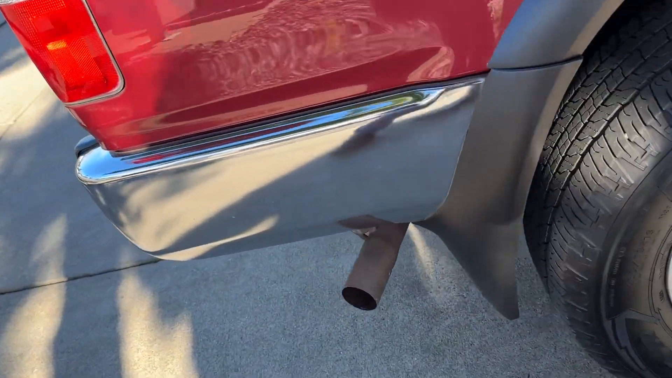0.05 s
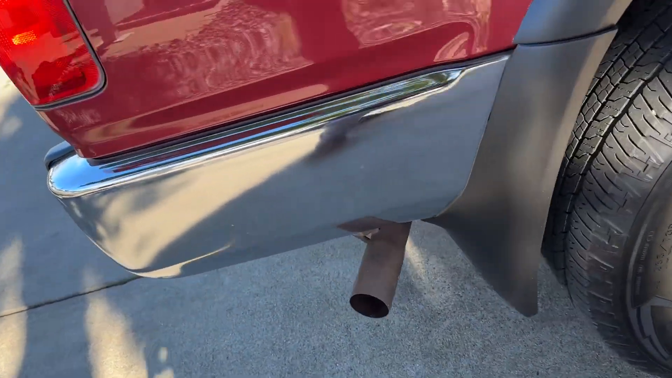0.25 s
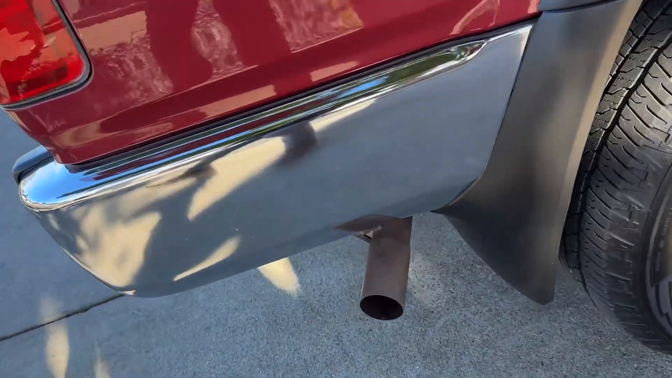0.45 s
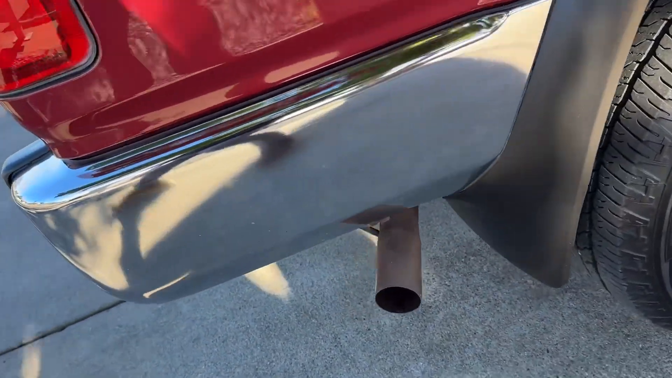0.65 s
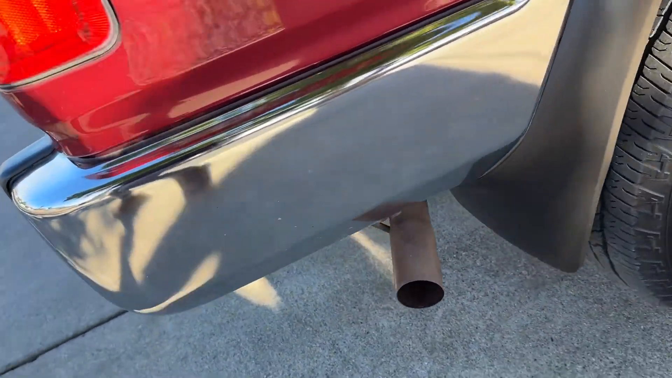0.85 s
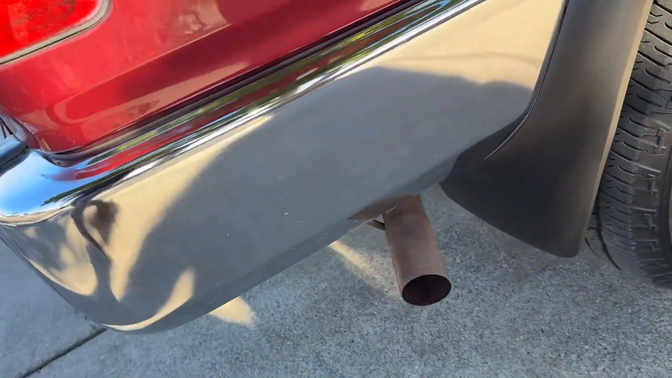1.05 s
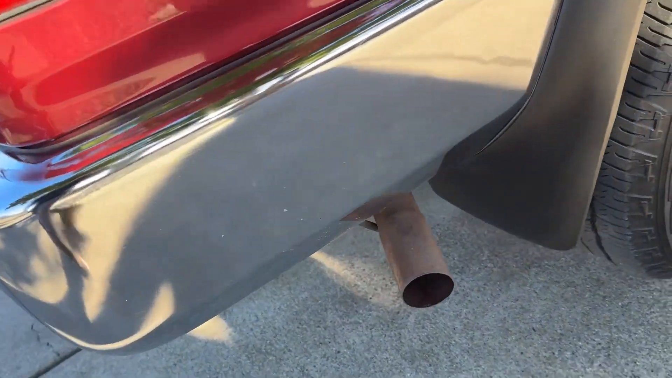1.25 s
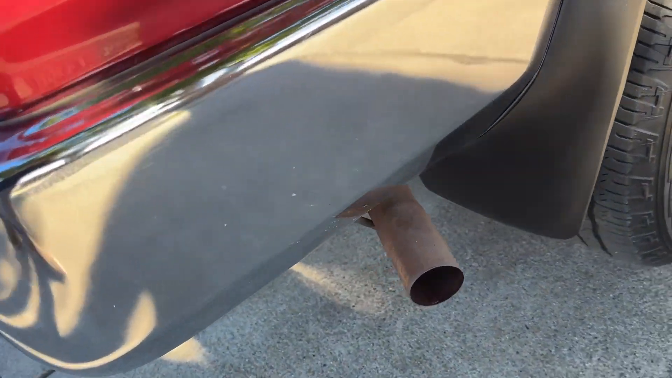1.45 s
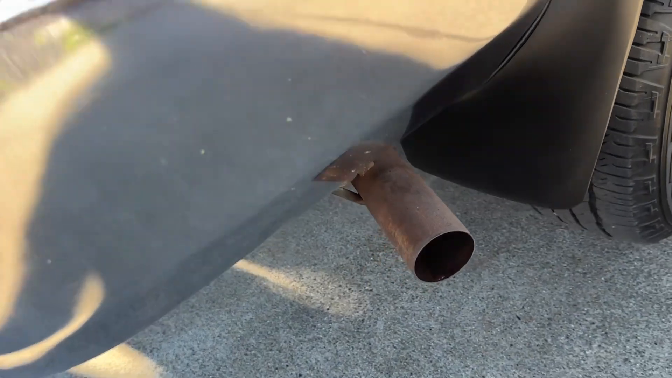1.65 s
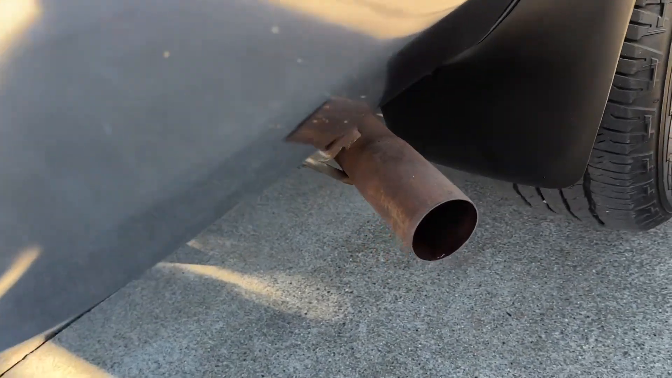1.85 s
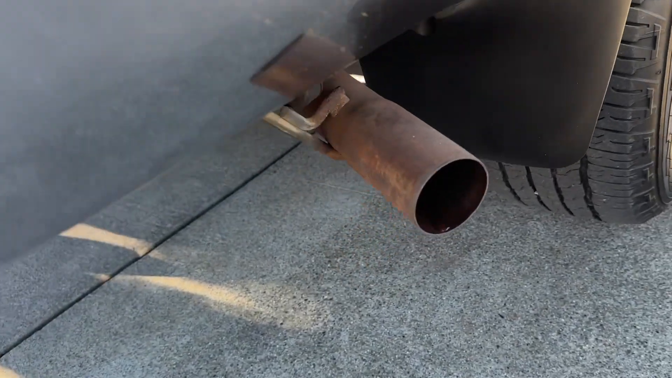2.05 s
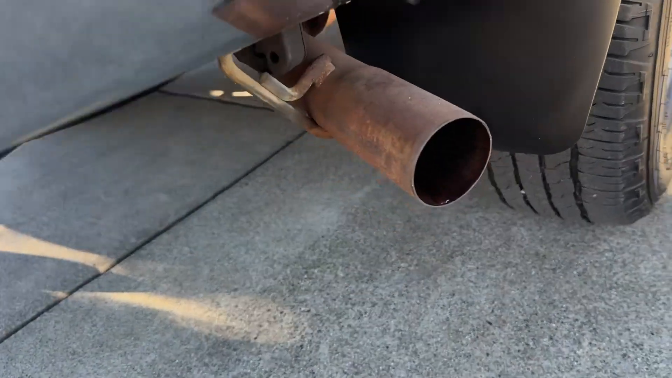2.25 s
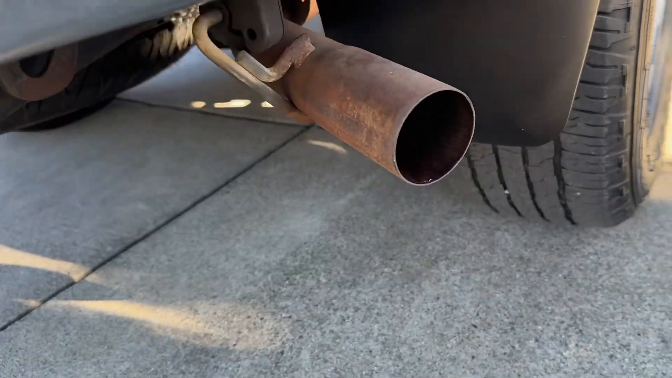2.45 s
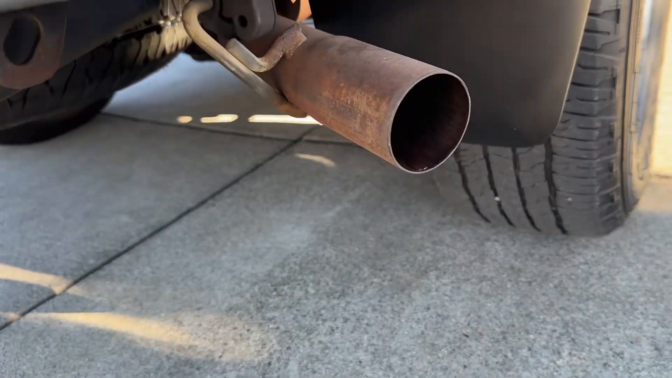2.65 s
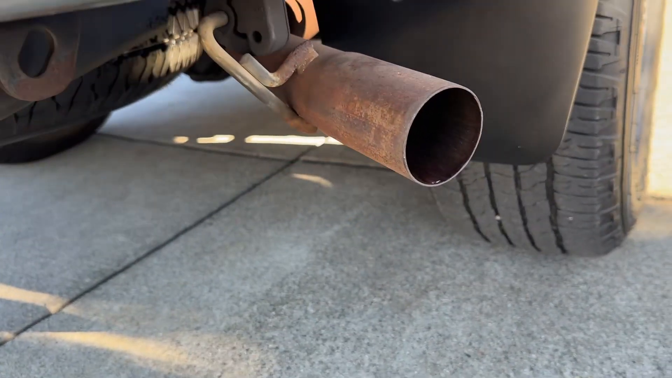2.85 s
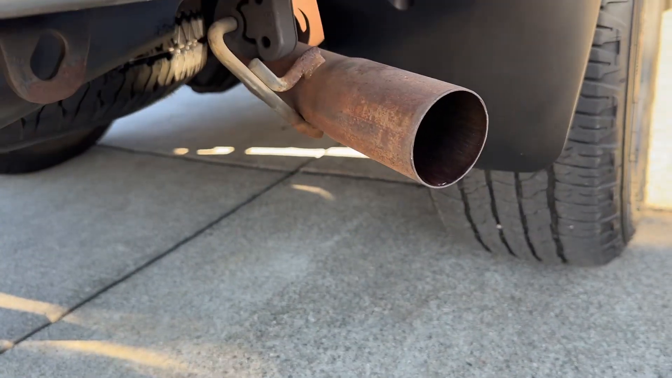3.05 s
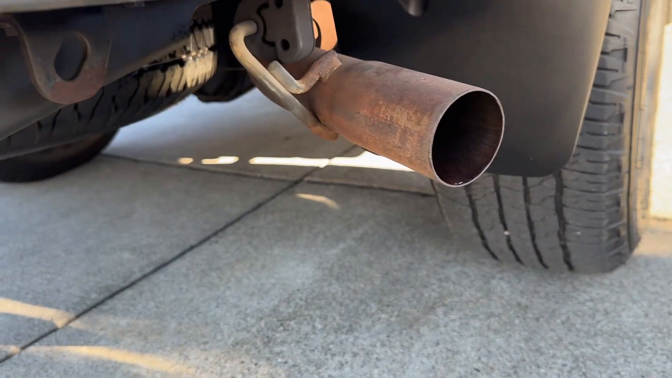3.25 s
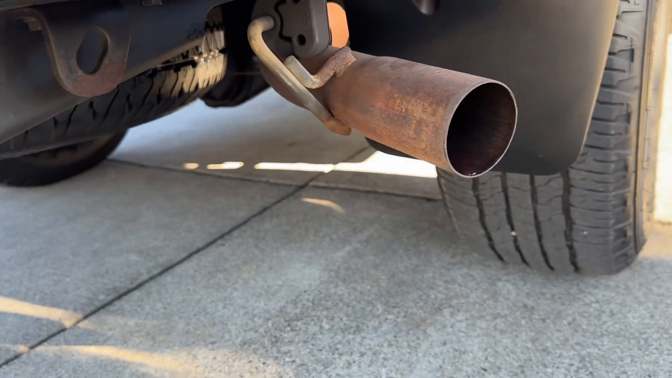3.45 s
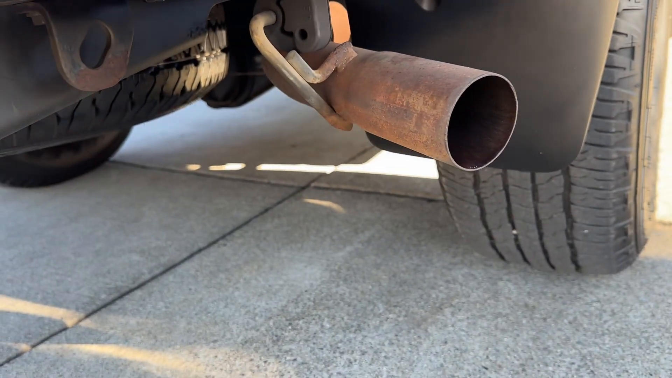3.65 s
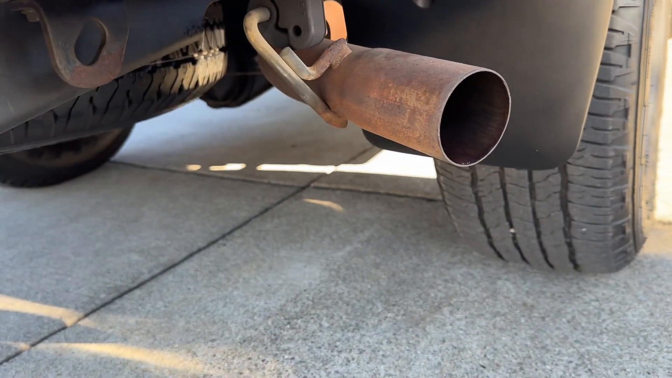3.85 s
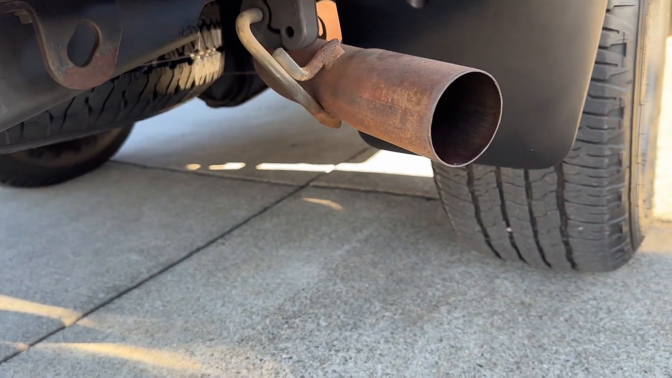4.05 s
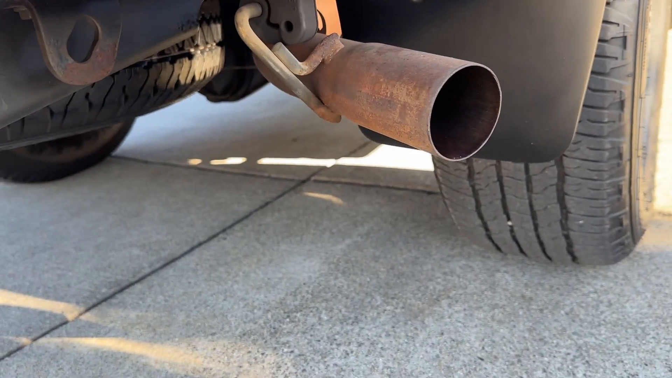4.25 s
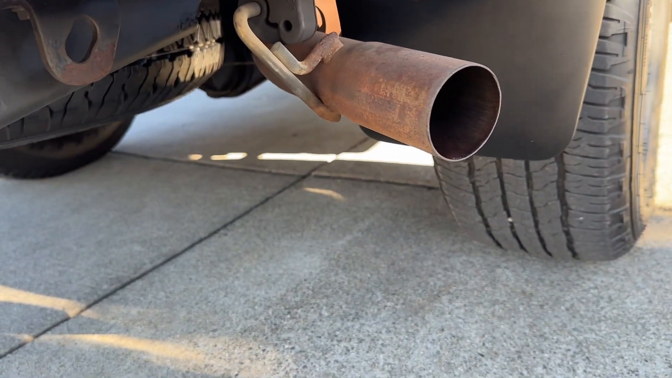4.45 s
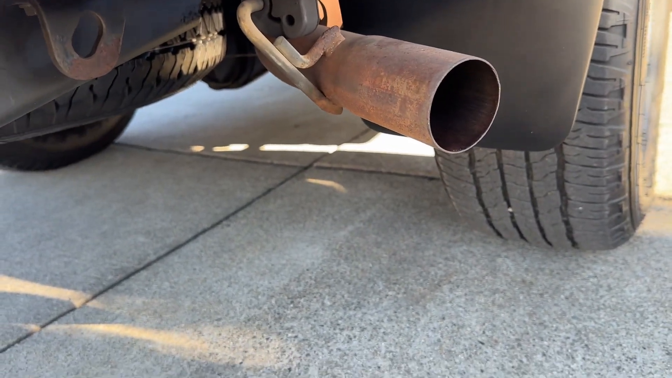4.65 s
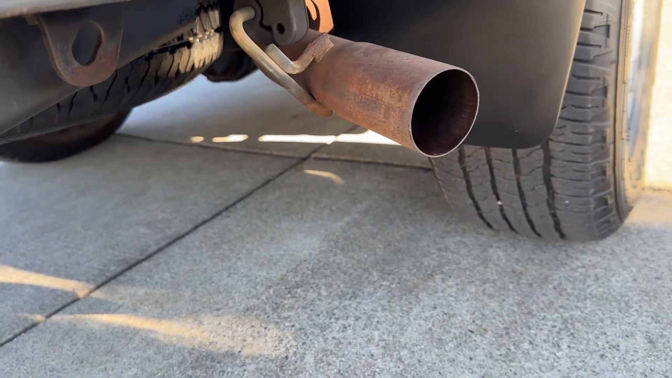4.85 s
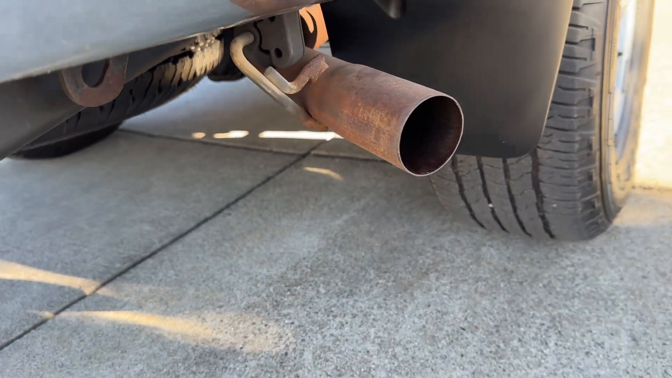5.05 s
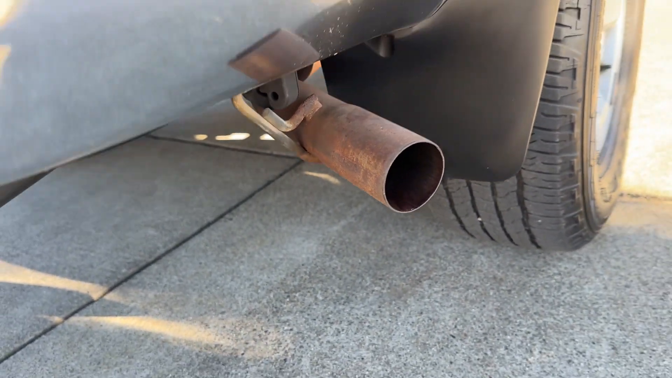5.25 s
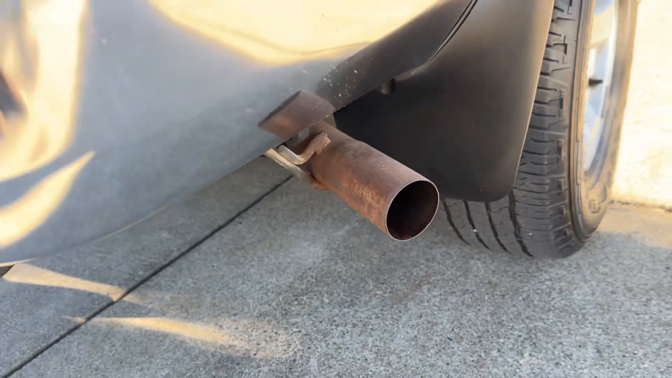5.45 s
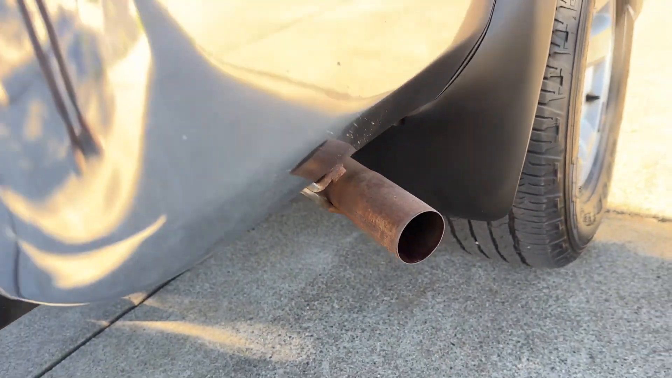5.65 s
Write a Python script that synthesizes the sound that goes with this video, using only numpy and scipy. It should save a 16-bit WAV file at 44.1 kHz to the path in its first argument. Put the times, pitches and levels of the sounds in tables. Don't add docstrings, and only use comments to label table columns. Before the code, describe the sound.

A truck's six-cylinder engine idles steadily outdoors, its low exhaust drone growing closer and raspier as the microphone sinks to the tailpipe.

```python
import sys
import numpy as np
from scipy import signal
from scipy.fft import rfft, irfft
from scipy.io import wavfile
from scipy.ndimage import uniform_filter1d

SR = 44100
rng = np.random.default_rng(int(sys.argv[2]) if len(sys.argv) > 2 else 0)


def master(y):
    cut = np.clip(np.atleast_2d(y).T, -1, 1)
    pcm = np.round(cut * 32767)
    wavfile.write(sys.argv[1], SR, pcm.astype(np.int16))


def gain_from_decibels(decibels):
    exponent = np.asarray(decibels, float) / 20
    return 10 ** exponent


N = 251370


def rms_one(x):
    return x / np.sqrt(np.mean(x ** 2) + 1e-20)


def at_hz(points, hz):
    known_hz, level_db = np.transpose(points)
    return np.interp(np.log(hz), np.log(known_hz), level_db)


def bell(s, width):
    return np.exp(-((np.arange(N) / SR - s) / width) ** 2)


def drift(rate):
    r = np.exp(-80 * np.pi * rate / SR)
    slow = signal.lfilter([1], [1, -2 * r, r * r], rng.standard_normal(N // 40 + 2002))[2000:]
    return np.interp(np.arange(N) / 40, np.arange(len(slow)), rms_one(slow))


def butter(x, order, hz, kind="low"):
    return signal.sosfilt(signal.butter(order, hz, kind, fs=SR, output="sos"), x)


def resonance(x, hz, width):
    r = np.exp(-np.pi * width / SR)
    return signal.lfilter([(1 - r * r) / 2, 0, (r * r - 1) / 2],
                          [1, -2 * r * np.cos(2 * np.pi * hz / SR), r * r], x)


def flickering(low_hz, top_hz, patchy_db, rate):
    out, together = 0, drift(4.3)
    edges = np.geomspace(low_hz, top_hz, round(2 * np.log2(top_hz / low_hz)) + 1)
    white = rng.standard_normal((2, N))
    for k, (low, high) in enumerate(zip(edges, edges[1:])):
        band = butter(white[k % 2], 2, [low, high], "band")
        depth_db = patchy_db * (1 + .5 * (low > 11000))
        out = out + gain_from_decibels(depth_db * (0.14 * together + drift(rate))) * band
    return out


def coloured(x, spectrum, turn=0):
    hz = np.arange(1, N // 2 + 2) * SR / N
    inside = (hz > spectrum[0][0] / 2) & (hz < spectrum[-1][0])
    shape = inside * gain_from_decibels(at_hz(spectrum, hz)) * np.exp(1j * turn)
    return rms_one(irfft(rfft(x) * shape, N))


def banded_noise(spectrum, patchy_db, rate):
    return coloured(flickering(spectrum[0][0] / 2, spectrum[-1][0], patchy_db, rate), spectrum)


# [f/Hz, level/dB per Hz]
YARD_SPECTRUM = [(40, 3.5), (140, 0), (700, -7.5), (900, -12.5), (1550, -7), (2000, -27), (3000, -19.5),
                 (4600, -29), (7300, -25), (8400, -41), (9300, -28.5), (12200, -39), (12900, -33.5),
                 (13250, -66.5)]


def yard_scatter(hiss):
    scatter = flickering(23.6, 16100, patchy_db=1.2, rate=14)
    out_of_step = coloured(hiss, YARD_SPECTRUM, turn=1.8)
    return gain_from_decibels(-39) * (0.73 * out_of_step + 0.49 * coloured(scatter, YARD_SPECTRUM))


# [f/Hz, level/dB per Hz]
BAY_SPECTRUM = [(1200, -3), (2000, 2.5), (3300, 0), (5300, -3.5), (6900, -3), (7700, -8), (8150, -1.5),
                (9500, -7), (10200, -17.5), (10450, -48.5), (12250, -42.5), (12600, -16), (15600, -10),
                (15850, -47)]


def engine_bay(hiss, firings, fifth_db):
    shade_db = -3.0 * np.exp(-((fifth_db + 28.5) / 1.5) ** 2)
    spray_db = 8.5 * bell(2.04, 0.02)
    valve_beat_db = .3 * np.cos(2 * np.pi * firings / 1.5) + .3 * np.cos(4 * np.pi * firings + .3)
    return gain_from_decibels(-50 + shade_db + spray_db + valve_beat_db) * coloured(hiss, BAY_SPECTRUM)


# [f/Hz, width/Hz, level/dB, loudest t/s, span/s]
WHISTLE_LINES = [
    (1897, 4, -59, 1.7, .4),
    (1174, 6, -57, .3, .5),
    (2378, 12, -62, 3.8, .7),
    (1430, 130, -54, 1.3, .4),
    (1060, 220, -48, 1.95, .2),
    (1375, 60, -55, 4.0, .7),
    (3060, 160, -61, 4.5, .6),
    (6600, 1500, -63, .2, .6),
    (6405, 5, -72, 3.0, 2.5),
    (12800, 60, -74, 3.5, 4.0),
]


def whistles():
    out = 0
    for hz, width, level_db, s, span in WHISTLE_LINES:
        thin = resonance(resonance(rng.standard_normal(N), hz, width), hz, width)
        out = out + gain_from_decibels(level_db) * bell(s, span) * rms_one(thin)
    return out


# [t/s, length/s, level/dB]
GUST_SWELLS = [(0.008, 0.061, -27), (0.28, 0.039, -28.5), (.47, 0.056, -28), (0.715, 0.085, -31),
               (1.26, 0.056, -25), (1.347, 0.076, -23.5), (1.45, 0.042, -18.5), (1.537, 0.082, -26),
               (1.612, 0.067, -22), (1.705, 0.039, -20), (1.89, 0.03, -29), (1.933, 0.028, -14.5),
               (2.015, 0.076, -18), (2.116, .06, -25), (2.75, 0.038, -24), (3.276, 0.058, -22.5),
               (3.682, 0.13, -21.5), (4.202, 0.072, -23), (4.858, 0.054, -29), (5.25, 0.056, -26),
               (5.665, 0.059, -23.5)]
# [f/Hz, level/dB per Hz]
BUFFET_SPECTRUM = [(30, -25), (48, -8), (70, 0), (107, -7), (150, -10), (240, -20), (340, -19), (450, -25),
                   (650, -36)]


def gusts():
    swell = sum(gain_from_decibels(level_db) * bell(s, length / np.sqrt(2)) for s, length, level_db in GUST_SWELLS)
    both, apart = (swell * banded_noise(BUFFET_SPECTRUM, patchy_db=1.0, rate=15) for _ in range(2))
    return both, gain_from_decibels(-14.0) * apart


# [f/Hz, level/dB per Hz]
SOLE_SPECTRUM = [(800, -1), (1150, 9), (2300, -5), (3700, 1), (4300, -3), (5200, 2), (7000, -0.5),
                 (10000, -3), (12500, -19)]


def scuff():
    t = np.arange(N) / SR
    peak_s, swell_s, fade_s = 2.033, 0.025, 0.012
    off_peak = (t - peak_s) / np.where(t < peak_s, swell_s, fade_s)
    stop_db = 1200 * np.maximum(t - 2.068, 0)
    stroke = gain_from_decibels(np.maximum(-35.5 - off_peak ** 2 - stop_db, -200))
    both, apart = (stroke * banded_noise(SOLE_SPECTRUM, patchy_db=0.0, rate=130) for _ in range(2))
    both = signal.sosfilt(signal.cheby2(10, 60, 10400, fs=SR, output="sos"), both)
    return both, gain_from_decibels(-2.5) * butter(apart, 4, 1900, "high")


# [f/Hz, level/dB per Hz]
FLOW_SPECTRUM = [(36, -9.5), (65, 1.5), (120, -3), (200, -5.5), (330, -11), (480, -16.5), (800, -23.5),
                 (1300, -24), (1700, -34.5)]


def gas_rush(rasp_db):
    return gain_from_decibels(0.58 * rasp_db - 6.0) * banded_noise(FLOW_SPECTRUM, patchy_db=-2.0, rate=5.4)


# [level/dB, lateness/share of a firing]
CYLINDER_PATTERN = [
    (0, 0),
    (-2.5, .008),
    (-.8, -.008),
]
# [t/s, level/dB]
ECHOES = [
    (.0095, -11),
    (.0225, -11),
]
# [f/Hz, width/Hz, far level/dB, near level/dB]
OUTLET_RINGS = [(621.3, 8.7, 12, 2), (698.5, 18, 7, -8), (738.7, 22, 0, 2.5), (810, 25, -1.5, -3),
                (938, 32, -0.5, -2), (1031, 20, 1, 1), (1110.5, 12, 3.5, -2), (1165.6, 37.4, 5.5, -3),
                (1226.6, 31, -4, -4), (1286, 45, -14, -10), (1307, 18, -9.5, -3.5), (1394, 21, -4.5, -8.5),
                (1543, 28, -1, -14), (1713, 11, -11.5, -19.5), (1793, 170, -11.5, -5),
                (1956, 90, -7.5, -15.5), (2083, 25, -17.5, -10.5), (2404, 24, -17.5, -8.5),
                (2550, 32, -18, -14), (3000, 120, -20, -12.5), (3690, 92, -23, -15)]


def blowdown_fronts(firings):
    count = np.arange(int(firings[-1]) - 1)
    pattern = np.array(CYLINDER_PATTERN)[count % len(CYLINDER_PATTERN)]
    chance = rng.standard_normal((len(count), 2))
    moment = count + .5 + pattern[:, 1] + .001 * chance[:, 0]
    at = np.interp(moment, firings, np.arange(N)).astype(int)
    fronts = np.full(N, 1e-18)
    for late_s, level_db in [(0.0021, 0.0099)] + ECHOES:
        fronts[at + int(late_s * SR)] += gain_from_decibels(level_db + pattern[:, 0] + 1.3 * chance[:, 1])
    return butter(rms_one(fronts), 6, 1500)


def outlet_rasp(firings, rasp_db):
    fronts = blowdown_fronts(firings)
    drive = gain_from_decibels(-3) * fronts + rng.standard_normal(N)
    closeness = np.clip((uniform_filter1d(rasp_db, size=SR // 2) + 47) / 13.9, 0, 1)
    rings = 0
    for k, (hz, width, far_db, near_db) in enumerate(OUTLET_RINGS):
        level_db = far_db + closeness * (near_db - far_db) + drift(.8)
        rings = rings + (-1) ** k * gain_from_decibels(level_db) * resonance(drive, hz, min(width, .025 * hz))
    body = gain_from_decibels(0.5 - 1.62 * closeness) * rms_one(rings)
    bark = resonance(resonance(fronts, 1300, 330), 1300, 330)
    return gain_from_decibels(rasp_db) * (body + closeness * gain_from_decibels(-2.5) * rms_one(bark))


# [firing multiple, level/dB]
ORDERS_NEAR = [(1, -42), (2, -14), (3, -2.5), (4, -17), (5, -9), (6, -29.5), (7, -23), (8, -23), (9, -17.5),
               (10, -21.5), (11, -39.5), (12, -26), (13, -35.5), (14, -35.5), (15, -23.5), (16, -38.5),
               (17, -41), (18, -37), (19, -35.5), (20, -48.5), (21, -36), (22, -49), (23, -32)]
# [firing multiple, level/dB]
ORDERS_FAR = [(1, -23), (2, -11), (3, -0.5), (4, -14.5), (5, -11.5), (6, -34), (7, -31.5), (8, -26),
              (9, -20.5), (10, -17), (11, -26.5), (12, -21), (13, -37.5), (14, -31), (15, -23.5), (16, -41),
              (17, -37.5), (18, -35.5), (19, -37), (20, -40.5), (21, -47.5), (22, -42), (23, -45.5)]
# [firing multiple, level/dB]
CAM_BELT_LINES = [
    (2.6667, -23),
    (5.3333, -27),
    (17.64, -33),
    (19.3333, -38),
    (26.6667, -42),
    (28.6667, -40),
    (31, -41),
]
# [t/s, level change/dB]
BOOM_SHAKES = [(.03, -2.5), (.25, 0), (.285, 2.5), (.38, -2), (1.32, -3.5), (1.38, 8), (1.43, -4),
               (1.49, -1), (1.545, -16), (1.615, 0.5), (1.675, -11), (1.78, 2), (1.982, -12), (4.177, -4.5),
               (5.22, 3), (5.57, 1.5), (5.665, -5.5), (5.692, -6)]


def order_phases(near):
    log_gain = np.log(gain_from_decibels(np.r_[near[0], near, near[-1], near[::-1]]))
    cepstrum = rfft(log_gain).real / len(log_gain)
    turns = np.outer(np.arange(len(near) + 1), np.arange(len(cepstrum))) / len(log_gain)
    return 2 * np.sin(2 * np.pi * turns) @ cepstrum


def pipe_tone(firings, fifth_db):
    near, far = np.array(ORDERS_NEAR)[:, 1], np.array(ORDERS_FAR)[:, 1]
    phases = order_phases(near)
    closeness = np.clip((fifth_db + 35.0) / 10, 0, 1)
    tone_db = fifth_db - far[4] - closeness * (near[4] - far[4])
    boom_db = -13.0 + 0.74 * (fifth_db + 23.5) + sum(db * bell(s, 0.015) for s, db in BOOM_SHAKES)
    out = 0
    for k in range(len(near)):
        level_db = tone_db + far[k] + closeness * (near[k] - far[k]) + .5 * drift(2.0)
        if k == 2:
            level_db = boom_db
        out = out - gain_from_decibels(level_db) * np.cos(2 * np.pi * (k + 1) * firings + phases[k + 1])
    for multiple, level_db in CAM_BELT_LINES:
        wander_db = 2.5 * drift(1.5)
        out = out + gain_from_decibels(tone_db + level_db + wander_db) * np.cos(2 * np.pi * multiple * firings)
    return np.sqrt(2) * out


# [t/s, firing f/Hz, fifth-order pipe level/dB]
APPROACH_PATH = [(0.0, 35.2, -37.5), (0.32, 36, -35.5), (0.891, 35.3, -33.5), (1.429, 35.55, -30),
                 (1.79, 35.53, -27.5), (2.201, 35.78, -23.5), (2.75, 35.7, -23), (3.73, 35.7, -23.5),
                 (4.11, 35.81, -24), (4.72, 36.2, -24.5), (5.15, 35.62, -25.4), (5.349, 35, -26.5),
                 (5.6, 35.72, -27), (5.7, 35.5, -27.5)]


def approach():
    s, *columns = np.transpose(APPROACH_PATH)
    firing_hz, fifth_db = (np.interp(np.arange(N) / SR, s, c) for c in columns)
    return np.cumsum(uniform_filter1d(firing_hz, size=SR // 2)) / SR, fifth_db


# [from t/s, to t/s, share of opposed bass left]
HAND_TURNS = [
    (2.093, 3.15, .22),
    (5.1, 5.6, .3),
]


def turn_hand(opposed):
    bass = signal.sosfiltfilt(signal.butter(2, 550, fs=SR, output="sos"), opposed)
    t, turn_s = np.arange(N) / SR, .07
    square_on = sum((1 - share) * (np.tanh((t - a) / turn_s) - np.tanh((t - b) / turn_s)) / 2
                    for a, b, share in HAND_TURNS)
    return opposed - bass * square_on


# [f/Hz, left minus right level/dB]
PORT_LEAN = [(200, 0), (380, -.4), (700, -.7), (1290, -3.2), (2380, 1.5), (3600, 6.5), (5500, 6.0),
             (8120, .3), (15000, 0)]


def port_lean(mid):
    lean = gain_from_decibels(at_hz(PORT_LEAN, np.arange(1, N // 2 + 2) * SR / N))
    return irfft(rfft(mid) * (lean - 1) / (lean + 1), N)


def scene():
    firings, fifth_db = approach()
    rasp_db = -43.5 + 7 * np.tanh((fifth_db + 30.5) / 5)
    hiss = flickering(23.6, 16100, patchy_db=1.2, rate=14)
    yard, bay = yard_scatter(hiss), engine_bay(hiss, firings, fifth_db)
    (wind, wind_apart), (sole, sole_apart) = gusts(), scuff()
    tone = pipe_tone(firings, fifth_db)
    mid = bay + whistles() + wind + sole + gas_rush(rasp_db) + outlet_rasp(firings, rasp_db) + tone
    turned_tone = gain_from_decibels(-32.0 + 3.0 * drift(1.5)) * (np.roll(tone, 40) - np.roll(tone, -40))
    side = turn_hand(yard + turned_tone + wind_apart) + sole_apart + port_lean(mid)
    return np.array([mid + side, mid - side])


def band_limit(x):
    return signal.sosfilt(signal.butter(12, 16250, fs=SR, output="sos"), x)


def record(dry):
    x = butter(dry, 4, 33, "high")
    top = 1.1
    return band_limit(x / (1 + (x / top) ** 4) ** .25)


dry = scene()
out = record(dry)
master(out)
```